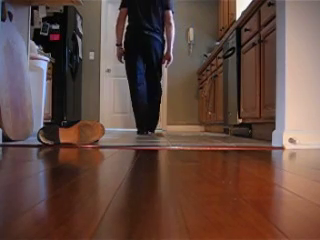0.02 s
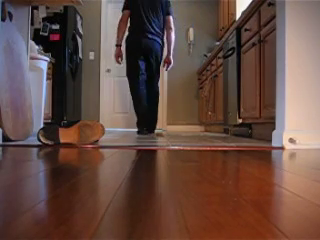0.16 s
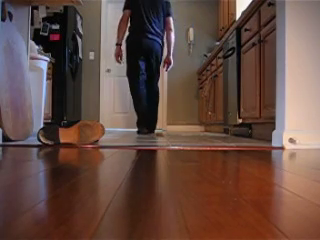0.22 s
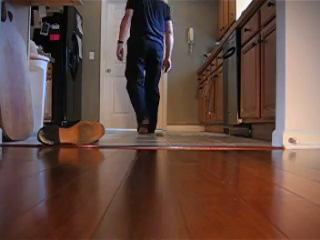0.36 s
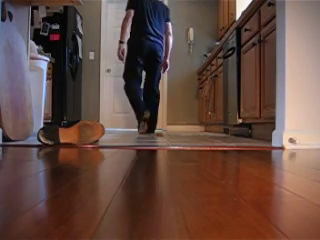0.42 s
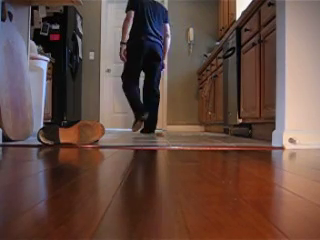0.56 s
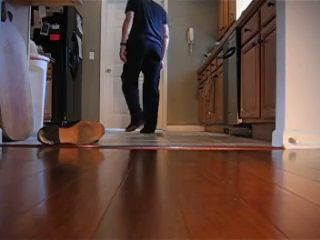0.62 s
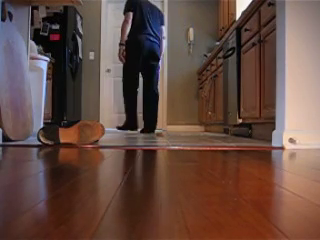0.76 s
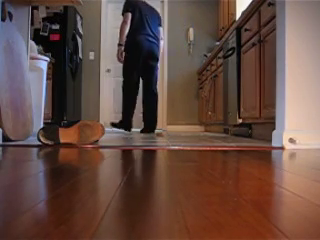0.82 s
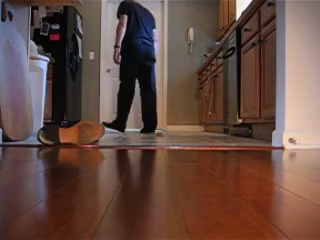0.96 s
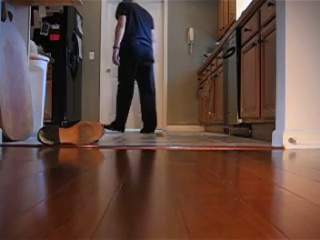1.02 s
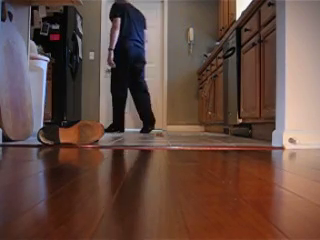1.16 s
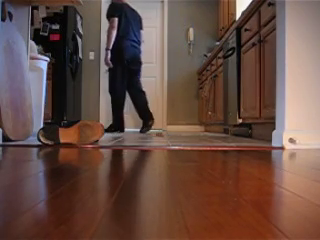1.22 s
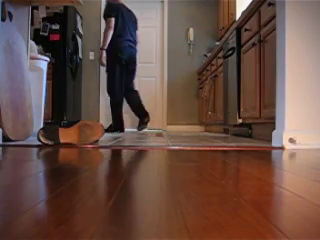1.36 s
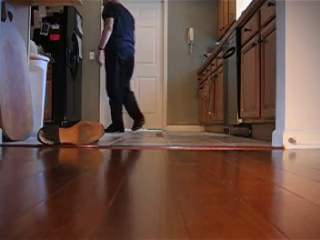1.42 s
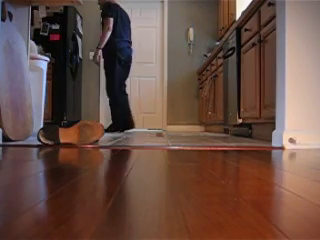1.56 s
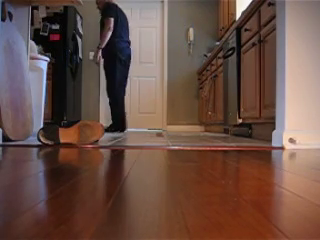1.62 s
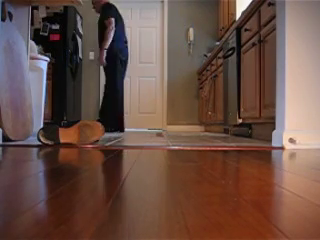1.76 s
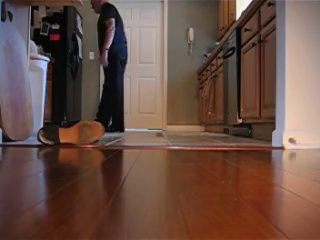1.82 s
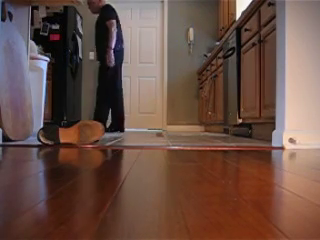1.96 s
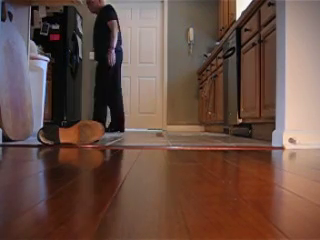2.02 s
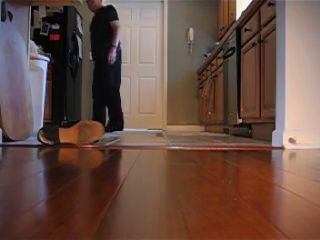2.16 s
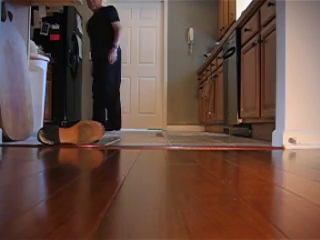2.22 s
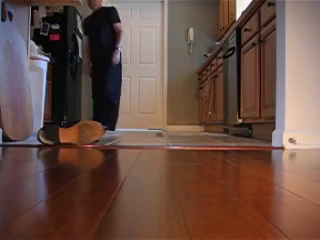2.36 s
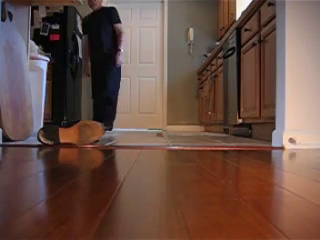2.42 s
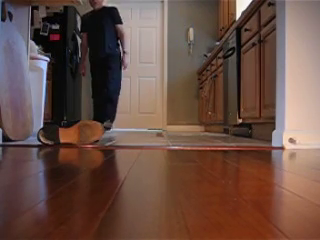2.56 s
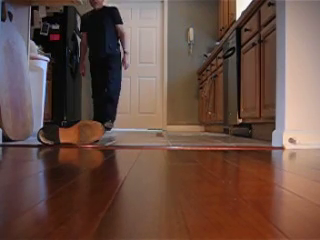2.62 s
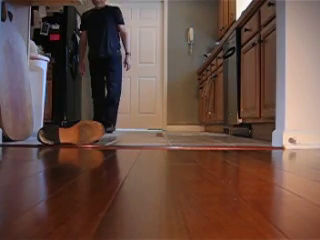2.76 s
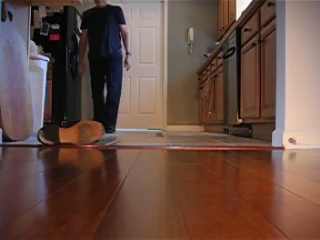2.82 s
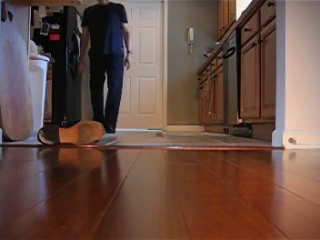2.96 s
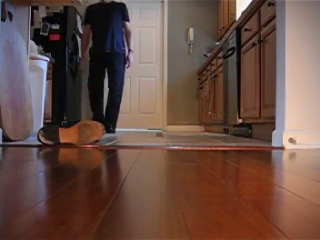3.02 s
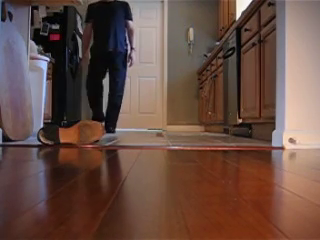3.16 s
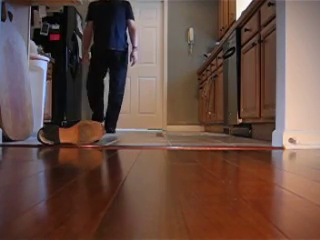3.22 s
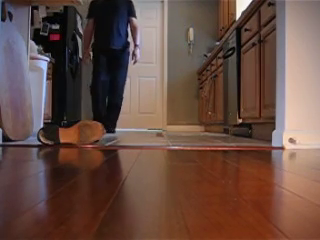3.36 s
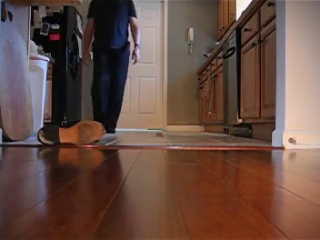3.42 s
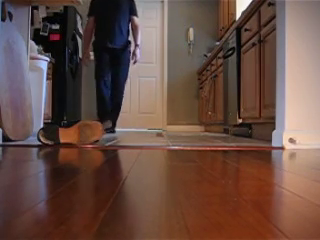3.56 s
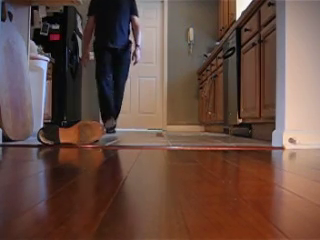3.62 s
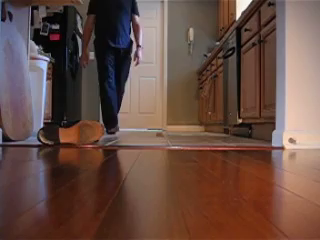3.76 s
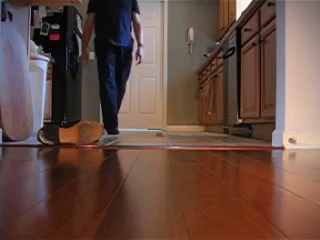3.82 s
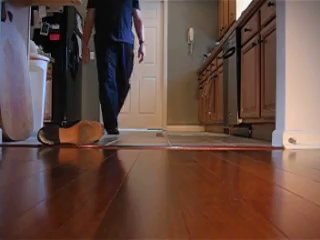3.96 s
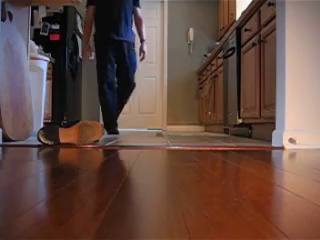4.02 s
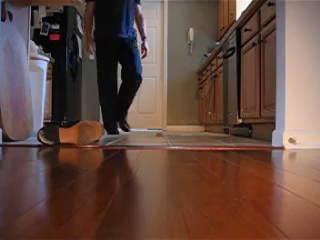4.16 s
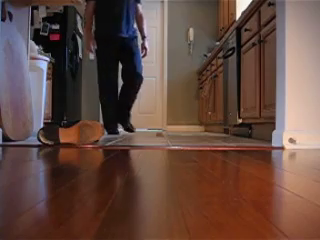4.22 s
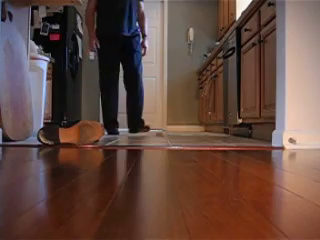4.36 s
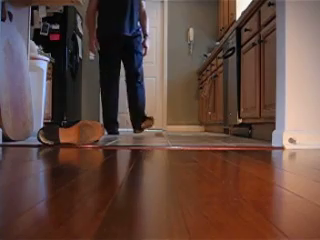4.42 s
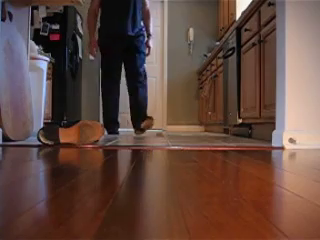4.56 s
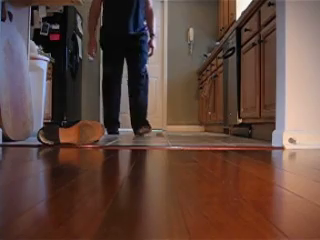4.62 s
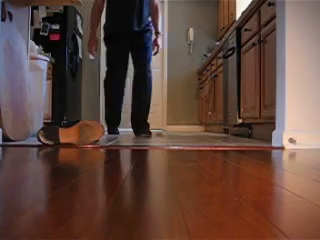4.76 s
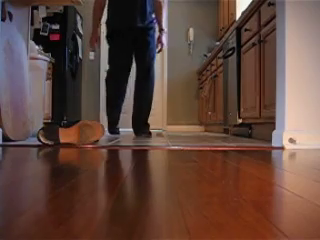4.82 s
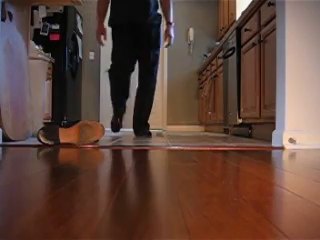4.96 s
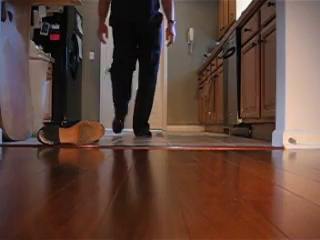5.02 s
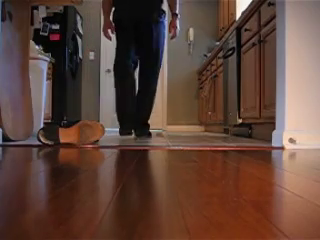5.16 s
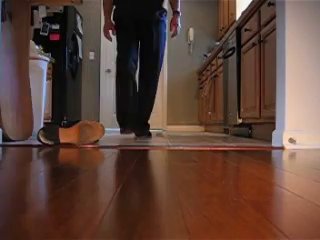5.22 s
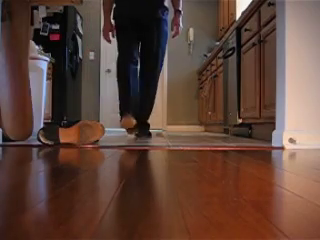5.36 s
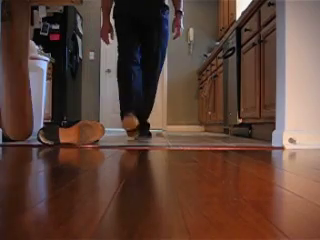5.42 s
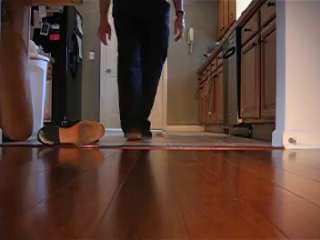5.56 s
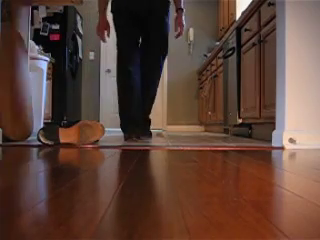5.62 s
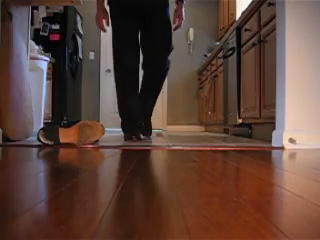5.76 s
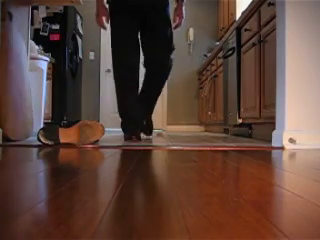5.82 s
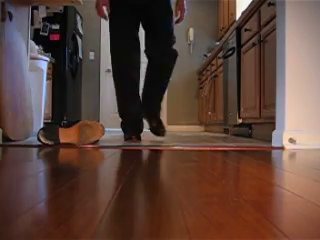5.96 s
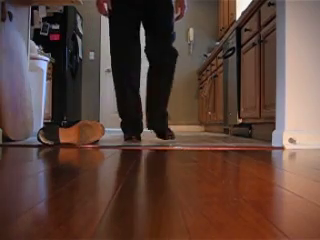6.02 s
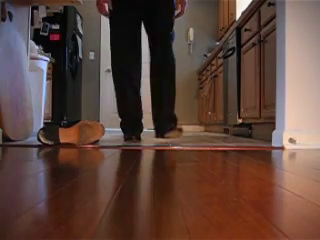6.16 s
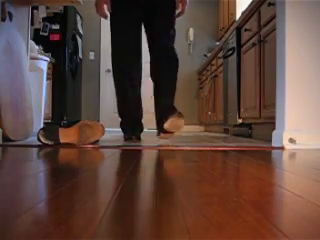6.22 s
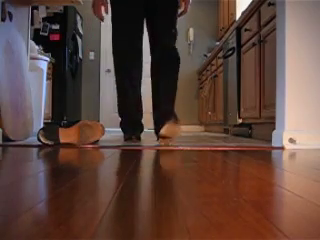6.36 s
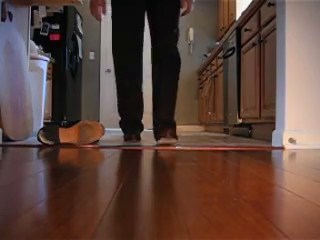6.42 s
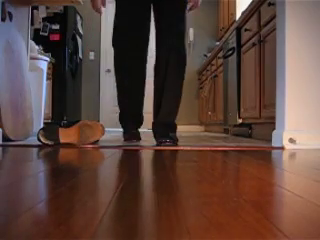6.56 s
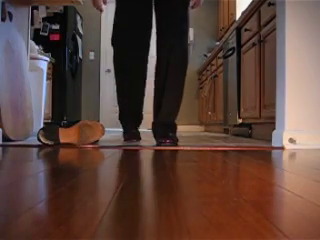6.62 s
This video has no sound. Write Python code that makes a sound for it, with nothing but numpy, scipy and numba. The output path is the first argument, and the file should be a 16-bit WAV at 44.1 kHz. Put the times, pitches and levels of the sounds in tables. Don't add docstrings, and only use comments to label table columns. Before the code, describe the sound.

Hard shoes with metal taps step slowly closer across a hard kitchen floor, each heel knock echoing over a faint fridge hum and hiss.

```python
import sys
import numpy as np
from scipy import signal
from scipy.fft import rfft, irfft
from scipy.io import wavfile
from scipy.ndimage import uniform_filter1d
from numba import njit

SR = 44100
rng = np.random.default_rng(int(sys.argv[2]) if len(sys.argv) > 2 else 0)


def gain_from_db(level_db):
    decades = np.asarray(level_db, float) / 20
    return 10 ** decades


def master_out(mix):
    frames = np.transpose(np.atleast_2d(mix))
    ceiling = np.clip(frames, -1, 1)
    pcm = np.round(ceiling * 32767).astype(np.int16)
    wavfile.write(sys.argv[1], SR, pcm)


N = 294588


def ring(x, hz, width_hz):
    return signal.lfilter(*signal.iirpeak(hz, hz / width_hz, fs=SR), x)


def ring_twice(x, hz, width_hz):
    return ring(ring(x, hz, width_hz), hz, width_hz)


def unit(x):
    return x / np.max(np.abs(x))


def add(out, start_s, x):
    i = int(start_s * SR)
    out[i:i + len(x)] += x[:N - i]


def waver(size):
    x = uniform_filter1d(rng.standard_normal(N), size=size)
    x = uniform_filter1d(x, size=size)
    return x / np.std(x)


def fridge_hum():
    hum_hz, beat_hz, first_dip_s = 59.08, 1.325, .49
    hum_db, second_db, waver_db = -37, -45, .6
    phase = 2 * np.pi * (np.arange(N) / SR - first_dip_s)
    first = gain_from_db(hum_db) * np.sin(hum_hz * phase)
    second = gain_from_db(second_db) * np.sin((hum_hz - beat_hz) * phase)
    return np.sqrt(2) * (first - second) * gain_from_db(waver_db * waver(size=3000))


def camera_whine():
    pitches_hz = [117, 223, 1823, 3646, 4829.3]
    levels_db = [-54, -53.5, -59, -64.5, -54]
    flutters_db = [5, 3, .6, 1.5, .3]
    t = np.arange(N) / SR
    whine = np.zeros(N)
    for hz, level_db, flutter_db in zip(pitches_hz, levels_db, flutters_db):
        level = gain_from_db(level_db + flutter_db * waver(size=1500))
        whine += level * np.sin(2 * np.pi * (hz * t + rng.random()))
    return np.sqrt(2) * whine


def camera_hiss():
    # pitch_hz, level_db (per Hz)
    colour_points = [(30, -8.5), (75, -16), (160, -24.5), (230, -22.5), (360, -28.5), (800, -33),
                     (1700, -39), (5400, -40.5)]
    hz, level_db = np.transpose(colour_points)
    f = np.maximum(np.arange(N // 2 + 1) * SR / N, 1)
    colour = gain_from_db(np.interp(np.log(f), np.log(hz), level_db))
    hiss = irfft(rfft(rng.standard_normal(N)) * colour, N)
    return gain_from_db(-40.5) * hiss / np.std(hiss)


def kitchen():
    return fridge_hum() + camera_whine() + camera_hiss()


def sway_joists(out, start_s, weight_db):
    # pitch_hz, level_db, t60_s
    joist_modes = [(16, -39, 1.), (24, -39, .8), (33, -40, .9), (50, -40, .8), (66, -38, .6)]
    t = np.arange(SR) / SR
    load = 1 - np.exp(-(t / 0.092) ** 2)
    for hz, level_db, t60_s in joist_modes:
        sway = np.sin(2 * np.pi * (hz * t + rng.random()))
        add(out, start_s, gain_from_db(weight_db + level_db + 7.5) * load * gain_from_db(-60 * t / t60_s) * sway)


def scuff(out, peak_s, level_db, hz, length_s):
    t = np.arange(SR // 2) / SR
    puff = np.exp(-(t / length_s - 1) ** 2 * 3)
    echo = 0.52 * gain_from_db(-60 * t / .5) * (t > length_s)
    grit = (puff + echo) * rng.standard_normal(len(t))
    add(out, peak_s - length_s, gain_from_db(level_db + 9) * ring_twice(grit, hz, 1.3 * hz))


def echoes(t, gap_s=0.0035, dense_s=0.04, uneven_db=1.0):
    share = np.clip(.14 + (t / dense_s) ** 2 * .1, 0, 1)
    drift = uniform_filter1d(rng.standard_normal(len(t)), size=200) * np.sqrt(200)
    size = rng.standard_normal(len(t)) * gain_from_db(uneven_db * drift)
    present = rng.random(len(t)) < share
    return size * present / np.sqrt(share) * np.clip(t / gap_s, 0, 1)


def room_tail(t, knock_hz, board_db, clatter_db):
    # pitch_hz, width_hz, level_db, t60_s (of the room)
    boards = [(105, 91, -2, 0.26), (252.5, 404, -1.5, 0.8), (366, 283, 1, 0.63), (482, 208, 0.5, 0.71)]
    # pitch_hz, width_hz, level_db, t60_s (of the room)
    clatter = [(1470, 960, -12.5, 0.67), (2173, 1230, -6.5, 0.6), (2930, 1330, -11, 0.61),
               (3870, 1200, -13, 0.4), (4810, 1300, -22, 0.58)]
    # pitch_hz, width_hz, level_db, t60_s (of the room)
    sole = [(777, 265, -5.5, 0.69), (1060, 320, -12, 0.89)]
    knock_t60_s = 0.6
    spot_share = .035
    layers = [(knock_hz, 324, 0, knock_t60_s)]
    layers += [(knock_hz, 70, 1, knock_t60_s)]
    layers += sole
    layers += [(hz, width_hz, db + board_db, t60_s) for hz, width_hz, db, t60_s in boards]
    for hz, width_hz, db, t60_s in clatter:
        spot_hz = hz * (1 + spot_share * rng.standard_normal())
        layers.append((spot_hz, width_hz, db + clatter_db, t60_s))
    room = echoes(t)
    signs = np.sign(rng.standard_normal(len(t)))
    tail = np.zeros(len(t))
    for k, (hz, width_hz, db, t60_s) in enumerate(layers):
        fading = room * np.roll(signs, k) * gain_from_db(-60 * t / t60_s)
        tail += gain_from_db(db) * ring_twice(fading, hz, 0.84 * width_hz)
    return tail


def strike(out, start_s, tap_db, knock_db, knock_hz, board_db, clatter_db):
    # pitch_hz, width_hz, level_db
    plate_modes = [(2950, 1000, 0), (4100, 900, -14)]
    t = np.arange(SR * 5 // 8) / SR
    blow = 1. * (t == 0)
    tap = sum(gain_from_db(db) * ring_twice(blow, hz, width_hz) / np.max(np.abs(ring_twice(blow, hz, width_hz)))
              for hz, width_hz, db in plate_modes)
    knock = unit(ring(ring(blow, knock_hz, 130), knock_hz, 900))
    tail = room_tail(t, knock_hz, board_db, clatter_db)
    add(out, start_s, gain_from_db(knock_db + 22) * tail)
    add(out, start_s - .0008, -gain_from_db(knock_db + 5) * knock)
    add(out, start_s, -gain_from_db(tap_db) * unit(tap))
    swell = (np.arange(220) / 220) ** 1.5
    lead = ring_twice(swell * rng.standard_normal(220), 1100, 1800)
    add(out, start_s - 220 / SR, gain_from_db(knock_db + 4.0) * lead)


def walker():
    # start_s, tap_db, knock_db, knock_hz, clatter_db
    touches = [(.030, -57, -63, 800, -4), (.119, -18, -32, 990, 2), (0.156, -42, -28, 950, -27),
               (1.100, -44, -25.5, 900, -11), (1.123, -50, -29.5, 900, -19), (1.426, -57, -57, 900, -4),
               (1.933, -13, -34.5, 1000, -6), (2.090, -38, -59.5, 900, 11.5), (2.799, -12, -31.5, 880, 2.5),
               (3.925, -31, -51, 900, 4.5), (4.429, -67, -57, 698, 0.5), (4.680, -59, -32.5, 815, 3.5),
               (5.552, -23, -22.5, 1000, -6.5), (6.421, -7.5, -31, 950, 4), (6.466, -28, -25.5, 900, -36)]
    # peak_s, level_db, pitch_hz,
    # length_s
    scuffs = [(0.303, -35, 327, .012), (0.843, -35.5, 480, 0.0068), (1.838, -39, 650, .008),
              (.459, -44, 4020, 0.0019), (1.345, -36, 4300, 0.0062), (1.379, -47, 3000, 0.018),
              (3.411, -53.5, 1870, 0.064), (4.431, -54, 3480, 0.019), (5.975, -50, 3450, 0.0043),
              (6.122, -39, 600, 0.0031), (6.189, -34, 600, 0.0057), (6.215, -38.5, 520, 0.004),
              (6.246, -39, 438, 0.0075)]
    # start_s, tap_db, knock_db, knock_hz, clatter_db
    steps = [
        (0.1052, -19, -19.5, 951, -13.5),
        (1.0253, -40, -15.5, 885, -18.5),
        (1.9192, -26, -23, 939, -12.5),
        (2.7736, -8, -16.5, 911, -14.5),
        (3.7519, -10.5, -17.5, 915, -6.5),
        (4.6355, -5.5, -14.5, 893, -9),
        (5.5137, -3, -14, 969, -7.5),
        (6.3967, -4, -17.5, 945, -8),
    ]
    # start_s, weight_db
    weight = [(0, 0.5), (1.9, 4), (2.8, 0), (3.7, 10), (6.4, 12.5)]
    out = np.zeros(N)
    for start_s, tap_db, knock_db, knock_hz, clatter_db in touches:
        board_db = -15 - 0.27 * knock_db
        strike(out, start_s, tap_db, knock_db, knock_hz, board_db, clatter_db)
    for row in scuffs:
        scuff(out, *row)
    for start_s, tap_db, knock_db, knock_hz, clatter_db in steps:
        weight_db = np.interp(start_s, *np.transpose(weight))
        board_db = -9.5 + 0.14 * weight_db
        strike(out, start_s, tap_db, knock_db, knock_hz, board_db, clatter_db)
        sway_joists(out, start_s, weight_db)
    return out


def scene():
    return (kitchen() + walker())[None]


@njit
def limit(x, top, ratio, attack, release):
    y, level = np.empty(len(x)), 0.
    for i in range(len(x)):
        y[i] = x[i] * min(1., (top / (level + 1e-9)) ** (1 - 1 / ratio))
        level += (abs(x[i]) - level) * (attack if abs(x[i]) > level else release)
    return y


def low_pass(x):
    return signal.sosfilt(signal.butter(12, 16500, fs=SR, output="sos"), x)


def record(dry):
    offset, ceiling = -.0485, .705
    top_hz, edge_hz = SR / 8, 6240
    x = limit(dry[0] + offset, 0.2, 5., .016, 0.0016) - offset
    x = signal.sosfilt(signal.ellip(6, .3, 50, top_hz, fs=SR, output="sos"), x)
    x = x * (np.arange(N) % 4 == 0) * 4
    x = np.convolve(x, signal.firwin(121, top_hz, window=("kaiser", 8), fs=SR), mode="same")
    x = signal.sosfiltfilt(signal.ellip(8, .3, 50, edge_hz, fs=SR, output="sos"), x) + offset
    x = np.clip(x, -ceiling, ceiling)
    x = signal.sosfiltfilt(signal.butter(4, 14500, fs=SR, output="sos"), x)
    return low_pass(x[None])


dry = scene()
out = record(dry)
master_out(out)
```